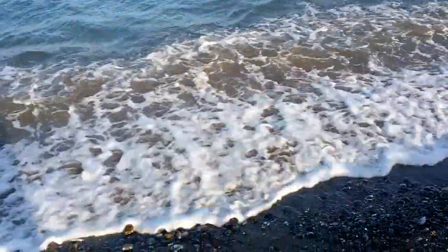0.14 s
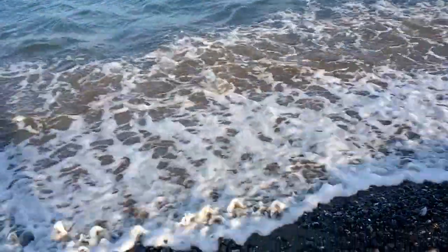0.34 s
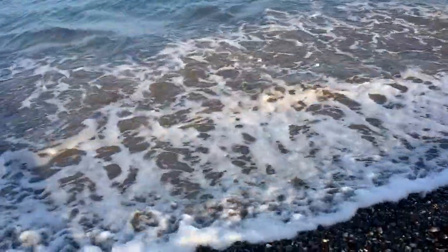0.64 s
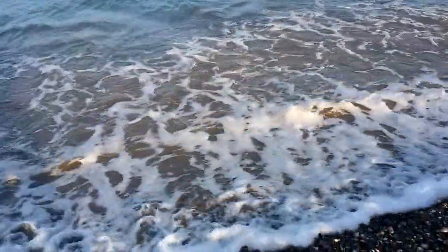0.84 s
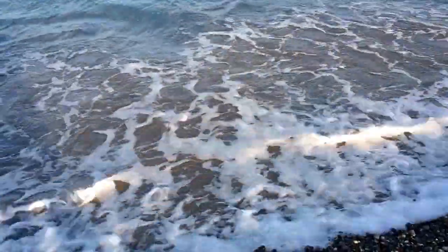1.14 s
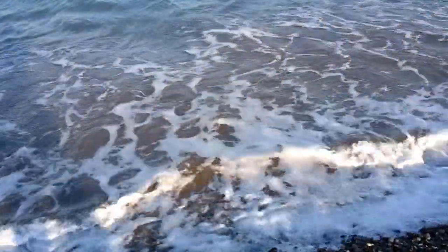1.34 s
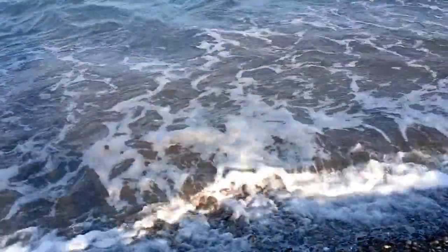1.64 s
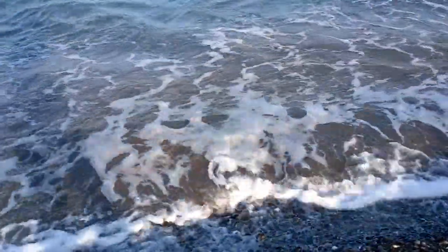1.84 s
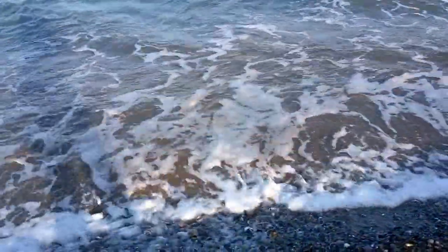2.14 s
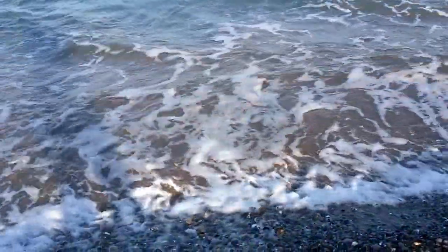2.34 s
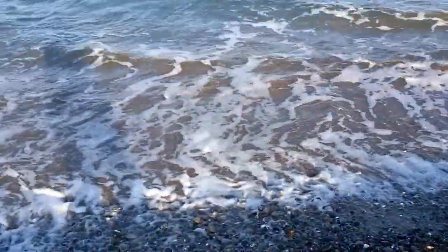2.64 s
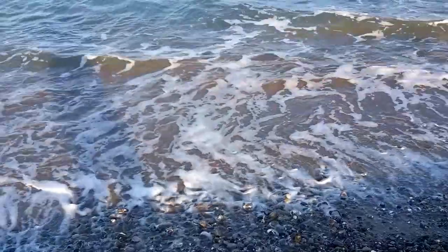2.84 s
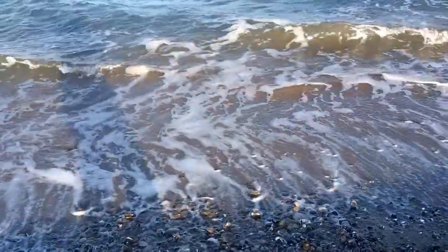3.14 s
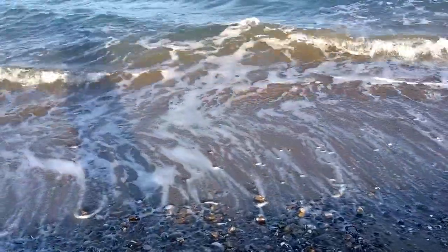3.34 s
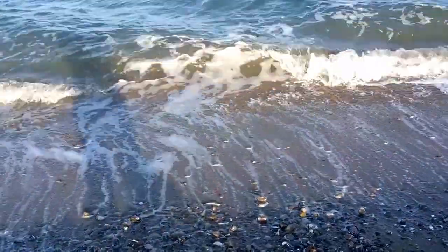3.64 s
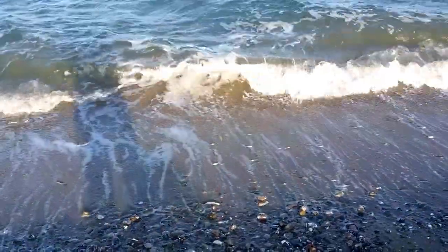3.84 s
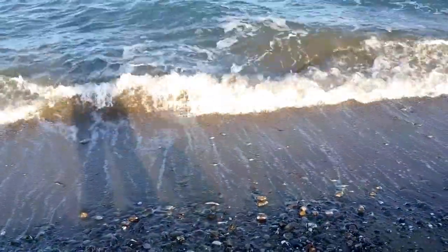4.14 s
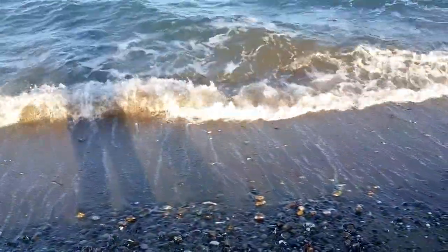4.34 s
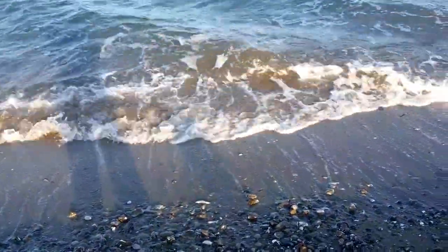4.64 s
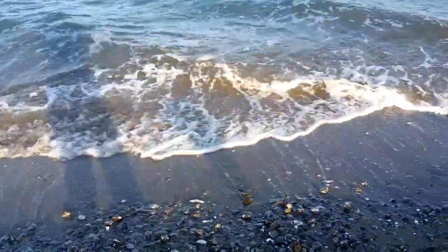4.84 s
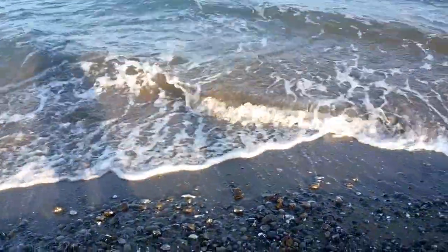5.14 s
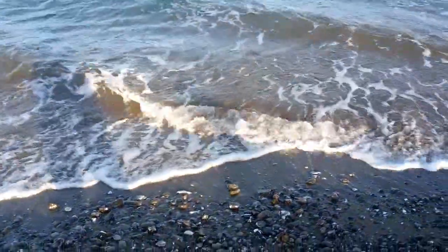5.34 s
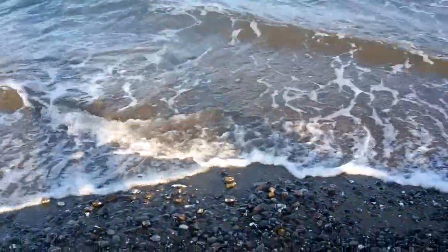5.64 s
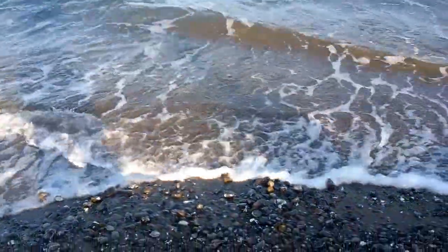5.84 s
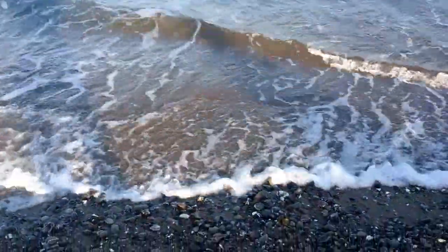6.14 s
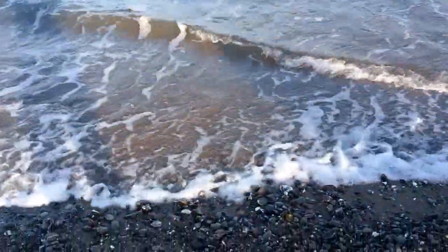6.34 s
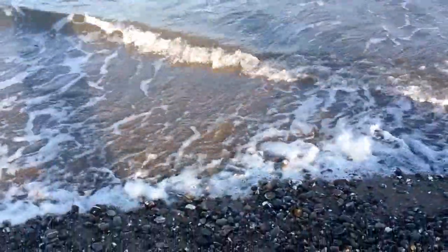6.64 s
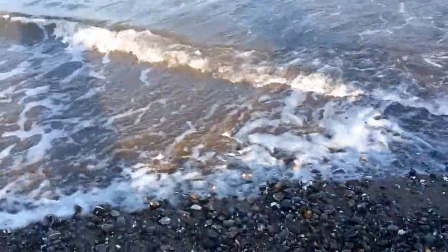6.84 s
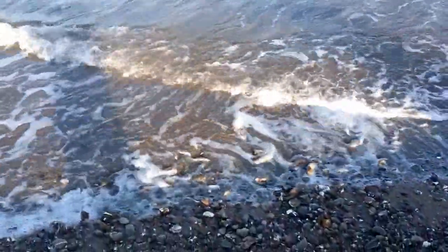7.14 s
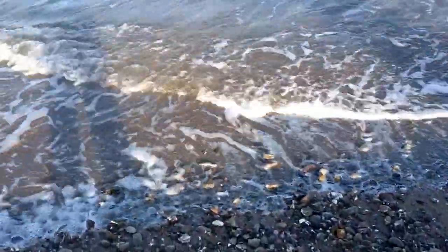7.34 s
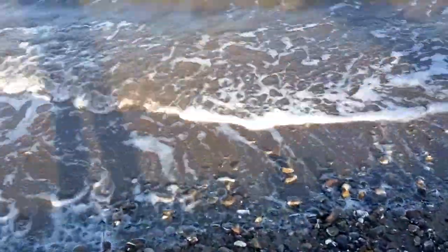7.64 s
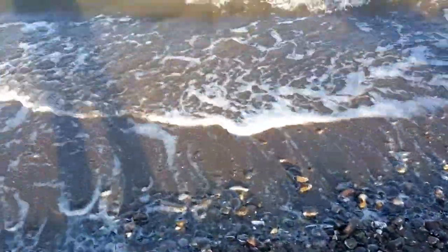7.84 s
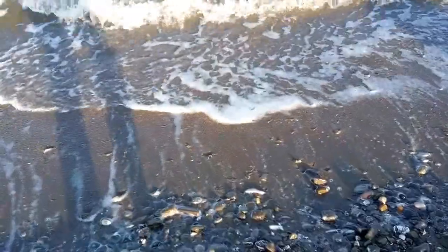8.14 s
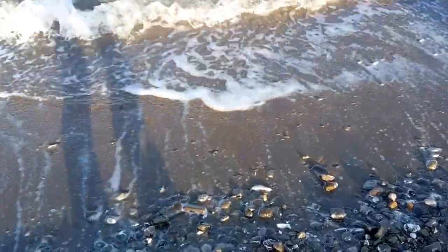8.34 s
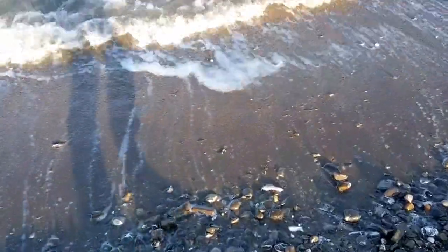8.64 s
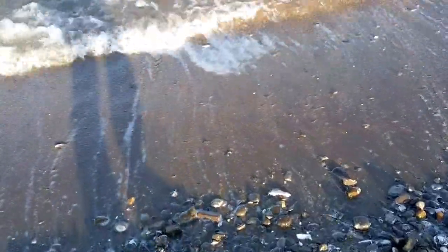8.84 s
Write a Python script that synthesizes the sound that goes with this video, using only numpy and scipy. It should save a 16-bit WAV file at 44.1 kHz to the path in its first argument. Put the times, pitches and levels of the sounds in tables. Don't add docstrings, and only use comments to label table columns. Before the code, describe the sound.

Outdoors on a pebble and sand shore, wind hits a small unprotected microphone, loud and fluttering with low rumble and crackly snaps. Behind it, foam hisses faintly, swelling near four seconds and again near eight. The wind drops abruptly around three seconds, returns, and weakens near the end. Tiny drop spatters and pebble ticks appear, clearest around six and a half to eight seconds.

```python
import sys
import numpy as np
from scipy import signal
from scipy.fft import rfft, irfft, next_fast_len
from scipy.io import wavfile
from scipy.ndimage import uniform_filter1d, minimum_filter1d, map_coordinates

SR = 44100
rng = np.random.default_rng(int(sys.argv[2]) if len(sys.argv) > 2 else 0)


def natural_amplitude(level_db):
    exponent = np.asarray(level_db, float) / 20
    return 10 ** exponent


def int16_out(signal):
    q = np.round(np.clip(np.atleast_2d(signal).T, -1, 1) * 32767)
    wavfile.write(sys.argv[1], SR, q.astype(np.int16))


N = 396459


def unit(x):
    return x / np.sqrt(np.mean(x ** 2) + 1e-20)


def curves(rows):
    s, *cols = np.transpose(rows)
    return [np.interp(np.arange(N) / SR, s, c) for c in cols]


def bumps(rows):
    s, *cols, ms = np.transpose(rows)
    t = np.arange(0, N + 64, 64) / SR
    bells = np.exp(-.5 * ((t[:, None] - s) / (.001 * ms)) ** 2)
    return [np.interp(np.arange(N) / SR, t, bells @ c) for c in cols]


def wobble(rate):
    knots = rng.standard_normal(1000 + N // 50)
    return map_coordinates(knots, [np.arange(N) * rate / SR])


def filtered(x, response):
    m = next_fast_len(N + SR // 2)
    return irfft(rfft(x, m) * response(np.fft.rfftfreq(m, 1 / SR)), m)[..., :N]


def coloured(x, spectrum):
    f, db = np.transpose(spectrum)
    return unit(filtered(x, lambda hz: natural_amplitude(np.interp(np.log(hz + 1), np.log(f), db, left=-120))))


def patchy(depth_db):
    z = signal.stft(rng.standard_normal(N), nperseg=512)[2]
    field = uniform_filter1d(rng.standard_normal(z.shape), size=8, axis=0)
    field = uniform_filter1d(field, size=8, axis=1)
    return signal.istft(z * natural_amplitude(depth_db * unit(field)), nperseg=512)[1][:N]


def crackle(density, spread_db):
    chance, size, sign = rng.random((3, N))
    click = natural_amplitude(-spread_db * np.log(size + .08)) * np.sign(sign - .5)
    return (chance < density / SR) * click


# (time [s], wash level [dB])
SURF = [(0, -42.5), (.55, -43), (.75, -48), (1.0, -46), (1.5, -52.5), (3.15, -46.5), (3.4, -42), (4.1, -38),
        (4.45, -40), (4.62, -39.5), (4.84, -41.5), (4.93, -46.5), (5.4, -49.5), (5.9, -49), (6.42, -51.5),
        (6.5, -47), (7.4, -44.5), (7.7, -42.5), (8.1, -39.5), (8.99, -41)]
# (frequency [Hz], level [dB per Hz])
WASH = [(150, -42), (400, -11), (1000, -13), (2000, -17.5), (3000, -22), (4500, -28), (6000, -30.5),
        (8000, -37.5), (11000, -42.5), (16000, -45)]
# (frequency [Hz], level [dB per Hz])
SPRAY = [(3000, -27), (5000, -1.5), (7000, -3), (9000, -6), (12000, -3), (16000, -6)]


def surf():
    flicker_db = 0.14 * wobble(5.6) + 0.71 * wobble(30)
    wash = coloured(patchy(depth_db=1.0) + 0.41 * unit(crackle(1200, spread_db=11.0)), WASH)
    spray = coloured(patchy(depth_db=.5) + .55 * unit(crackle(500, spread_db=5.5)), SPRAY)
    wash_db, = curves(SURF)
    spray_db = -60 + 0.4 * (wash_db + 45)
    wash *= natural_amplitude(wash_db + 3.5 + 0.43 * wobble(15))
    spray *= natural_amplitude(spray_db + 1.0 + .8 * wobble(5))
    return natural_amplitude(flicker_db) * (wash + spray)


# (start [s], length [s], level [dB])
SPLASHES = [
    (-.01, .025, -50),
    (4.585, .05, -56),
    (6.442, .11, -50.5),
    (6.694, 0.056, -55.5),
    (7.435, 0.1, -43.5),
    (8.035, .04, -47),
    (8.63, .05, -55),
]


def splashes():
    t = np.arange(N) / SR
    shower = coloured(rng.standard_normal(N) * 0.21 + unit(crackle(2500, spread_db=-0.5)), SPRAY)
    shower *= natural_amplitude(3.1 * wobble(70))
    gate = np.zeros(N)
    for s, span, db in SPLASHES:
        fade_db = 5 * np.clip(.5 - (t - s) / span, -1, 1)
        edges = np.clip(np.minimum(t - s, s + span - t) / 0.0081, 0, 1)
        gate += natural_amplitude(db + fade_db) * edges
    return gate * shower


# (time [s], peak level [dB], brightness [dB])
TICKS = [(0, -28, -15), (.5314, -39, -20), (0.7132, -28, -32), (1.4336, -38, -25), (1.704, -33, -23),
         (1.709, -35.5, -33), (3.258, -30, -30), (3.2934, -37, -23), (3.3114, -34, -19), (3.3827, -23, -23),
         (3.505, -29, -29), (4.53, -29.5, -22), (4.673, -26, -20), (4.7935, -30, -24), (6.449, -33, -23),
         (6.4566, -26.5, -21.5), (6.489, -27, -23), (6.508, -35.5, -25), (6.5264, -40, -15),
         (6.5424, -31, -20), (7.2638, -32, -21), (7.425, -33, -23), (7.4414, -33, -18), (7.547, -27.5, -18),
         (7.5854, -30, -18), (7.67, -28, -25), (7.751, -29.5, -21), (8.0357, -26, -23), (8.0534, -31, -24),
         (8.646, -26.5, -19)]
TICK_MS = 1.3


def ticks():
    out, t = np.zeros(N + SR), np.arange(SR // 25) / SR
    dull = signal.butter(2, [3000, 8000], "band", fs=SR)
    bright = signal.butter(1, [7000, 14000], "band", fs=SR)
    for s, db, bright_db in TICKS:
        puff = rng.standard_normal(len(t)) * np.exp(-.5 * (2200 * t / TICK_MS - 2.5) ** 2)
        body = signal.lfilter(*dull, puff) + natural_amplitude(bright_db + 15.5) * signal.lfilter(*bright, puff)
        out[round(s * SR):][:len(t)] += natural_amplitude(db - 4.0) * body
    return out[:N]


# (time [s], level [dB], air speed as share of power above 500 Hz [dB])
WIND = [(0, -11.5, -5), (1.6, -15.5, -4.5), (1.77, -23.5, -21), (1.97, -19, -15), (2.02, -13, -8),
        (2.85, -19, -6), (2.92, -38.5, -19), (3.4, -27, -23), (3.6, -18, -21), (4.3, -13.5, -6.5),
        (4.75, -16, -17.5), (5.3, -12, -12.5), (5.85, -13.5, -3.5), (6.3, -14, -5.5), (6.95, -14, -9.5),
        (7.72, -20.5, -17.5), (7.82, -31, -13), (8.99, -28.5, -10)]
# (time [s], level change [dB], speed change [dB], half width [ms])
PUFFS = [(.7, 1, 2, 56), (.87, 3.5, 2, 24), (1.01, 1.5, 2, 70), (1.25, -0.5, 2.5, 25), (1.47, 1, 2.5, 65),
         (1.72, 10, -14, 13), (1.95, 2.5, 0, 15), (2.1, -2, 6.5, 45), (2.2, 11, -18, 25),
         (2.4, 4.5, -1, 25), (2.69, 3.5, -10, 54), (3.06, 4, -20, 13), (3.18, 2, -8, 7.5),
         (3.25, 4.5, -20, 48), (3.58, 4.5, -3, 53), (4.05, 3, 3, 28), (4.28, 4, 0, 15), (4.63, 7, -3, 6.7),
         (5.48, -1, 10, 43), (5.82, 1.5, 4.5, 34), (7.15, 3, -3, 85), (7.46, 3, 9, 40), (7.55, 9, 11, 9.3),
         (7.76, 5.5, -22, 14), (7.93, 6, -13, 17), (8.03, 9, -8, 12), (8.21, 11, -5, 48),
         (8.43, 9.5, -2, 21), (8.6, 4.5, -2, 21), (8.96, 8.5, -8, 17)]
# (time [s], level change [dB], speed change [dB], half width [ms])
LULLS = [(.06, -2, 3.5, 28), (.43, -4.5, 0, 17), (.55, -1.5, -1.5, 97), (.8, -1, 2, 14),
         (1.12, -6, -4.5, 66), (1.3, -8, -15, 14.5), (1.62, -2, -12, 19), (1.76, -5, -9, 13),
         (1.985, -6, -3, 6.8), (2.29, -1, -1.5, 27), (2.54, -4, 1.5, 21), (2.74, -7, 3, 20),
         (3.01, 0.5, -7, 30), (3.95, -5.5, 3, 33), (4.83, -5.5, 1, 21), (5.25, -7.5, -1.5, 33),
         (5.58, -9, -1, 13), (5.66, -3, -2.5, 43), (5.92, -0.5, -26, 28), (6.022, -11.5, -9.5, 42),
         (6.89, -7, 0, 84), (7.51, -6, -15, 11), (7.61, -4, 0, 29), (7.88, -7, -22, 52), (8.21, 0, 4, 8.6),
         (8.31, 1, 0, 25)]


def air():
    return np.add(curves(WIND), bumps(PUFFS + LULLS))


def strays(share_db, level_db):
    place, size, span = rng.random((320, 3)).T
    at = (place * N).astype(int)
    speed_db = 1.24 * np.maximum(share_db[at] + 7, -6.5)
    db = -26 + speed_db + level_db[at] + 13.5 - 4.5 * size
    return list(zip(place * N / SR, db, 1.07 + 6 * span ** 2))


# (time [s], level above 1.2 kHz [dB], half width [ms])
SWIRLS = [(.113, -28, 11), (.327, -20.5, 54), (.849, -15, 5.2), (.984, -29, 16), (1.042, -22, 11),
          (1.171, -26.5, 21), (1.235, -23.5, 21), (1.531, -17.5, 8.8), (1.576, -18, 4.4),
          (1.655, -17.5, 7.4), (2.058, -20, 5.6), (2.148, -18.5, 9.3), (2.216, -20.5, 24),
          (2.377, -13.5, 9), (2.594, -27, 3.6), (2.681, -21, 10), (2.784, -23.5, 7.9), (5.473, -13.5, 13),
          (5.845, -14, 12), (5.893, -11, 6.1), (6.212, -11.5, 10), (6.283, -11, 9.6), (6.357, -11.5, 18),
          (6.491, -14.5, 35), (6.601, -20.5, 15), (6.637, -19, 19), (6.753, -21.5, 6.7), (7.079, -18, 9.9),
          (7.472, -19, 7.4), (7.541, -20.5, 5.3)]
# (time [s], level above 1.2 kHz [dB], half width [ms])
SNAPS = [(.266, -21, 4.4), (.402, -12, 2.2), (0.687, -17, 9.5), (.715, -7, 3.5), (1.376, -20.5, 5.3),
         (1.434, -15, 1.8), (1.45, -25, 1.6), (1.475, -22.5, 3.7), (1.713, -25, 2.2), (1.902, -28, 1.4),
         (2.016, -16, 4.3), (2.083, -26, 2.6), (2.163, -15, 1.2), (2.354, -18, 2.8), (2.471, -21, 2.6),
         (2.619, -19.5, 4.4), (2.66, -17.5, 4.8), (3.386, -26, 2.1), (4.517, -23, 2), (4.928, -20, 2.5),
         (5.146, -20.5, 6.1), (5.351, -23, 8.1), (5.394, -23, 5.2), (5.773, -17, 8.8), (5.86, -16, 3),
         (6.15, -15, 2.1), (6.313, -13, 4.1), (6.57, -15.5, 4), (6.779, -19, 11), (7.208, -21, 5)]


def eddies(share_db, level_db):
    t = np.arange(N) / SR
    power, kicks = np.full(N, 1e-9), np.zeros(N)
    every = list(SWIRLS) + list(SNAPS) + strays(share_db, level_db)
    for (s, db, ms), (sign, size) in zip(every, rng.random((len(every), 2))):
        near = slice(max(round((s - .1) * SR), 0), round((s + .1) * SR))
        since = t[near] - s
        power[near] += natural_amplitude(2 * (db - 3)) * np.exp(-.5 * (since / (.001 * ms)) ** 2)
        core_s = 0.00014 * (1 + 0.25 * size) * natural_amplitude(-.22 * (db + 24.5))
        u = since / core_s
        kicks[near] += np.sign(sign - .5) * natural_amplitude(db + 4.5) * u * np.exp(-.5 * u ** 2)
    return power, kicks


def corner(edge_hz, share_db):
    return edge_hz / np.log(1 + 1 / natural_amplitude(2 * np.clip(share_db, -60, 6)))


KNEE_HZ = 130


def turbulence(width_hz):
    hz, frames, z = signal.stft(rng.standard_normal(N), SR, nperseg=256, noverlap=224)
    scale = hz[:, None] / np.interp(frames, np.arange(N) / SR, width_hz)
    shape = (scale + 0.25) ** 0.44 * np.exp(-.6 * scale ** 1.062)
    shape /= np.sqrt(np.mean(shape[(hz > KNEE_HZ) & (hz < 550)] ** 2, axis=0))
    return signal.istft(z * shape, SR, nperseg=256, noverlap=224)[1][:N]


# (time [s], level change [dB], half width [ms])
HEAVES = [(.05, -0.5, 110), (.4, -7, 120), (.67, 1, 26), (1.04, 5, 30), (1.25, 7, 42), (1.75, 2.5, 33),
          (2.1, 3, 61), (2.45, 7.5, 120), (4.08, 7, 48), (4.23, 12.5, 25), (4.5, 8.5, 94), (4.86, 8.5, 125),
          (5.2, 0, 60), (5.7, -6, 75), (5.93, -2.5, 21), (6.08, 9, 11), (6.22, 7, 19), (6.45, 5, 82),
          (6.79, 3.5, 29), (7.25, 0, 71), (7.48, 6.5, 60), (7.79, 5.5, 30), (7.94, 8, 34), (8.11, 9.5, 20),
          (8.71, 6, 17), (8.87, 7, 47)]


def wind():
    level_db, share_db = air()
    power, kicks = eddies(share_db, level_db)
    level_db = level_db + 1.84 * wobble(12)
    eddy_hz = corner(1084, 10 * np.log10(power) - level_db - 11.0)
    flow_hz = corner(437, share_db - 5.0) * natural_amplitude(0.81 * wobble(40) + 0.42 * wobble(170))
    width_hz = (eddy_hz ** 4 + flow_hz ** 4) ** (1 / 4) * natural_amplitude(1.37 * wobble(260))
    flutter = filtered(turbulence(width_hz), lambda f: 1 / np.sqrt(1 + (KNEE_HZ / (f + 1)) ** 6))
    rumble = unit(filtered(rng.standard_normal(N), lambda f: 1 / np.sqrt(1 + (f / KNEE_HZ) ** 6)))
    gusty = 1 + 0.07 * np.clip(-15 - curves(WIND)[0], 0, 20)
    throb_db = (0.38 * wobble(18) + 1.75 * wobble(60)) * gusty
    rumble_db = -24.5 + 0.59 * (level_db + 14.5) - 0.14 * (share_db - 2)
    rumble_db += bumps(HEAVES)[0] + 1.5 * wobble(9)
    flutter *= natural_amplitude(level_db + 18.0 + throb_db)
    rumble *= natural_amplitude(rumble_db + 4.5 + 0.12 * throb_db)
    return flutter + rumble + kicks


def scene():
    return (surf() + splashes() + ticks() + wind())[None]


def low_pass(x):
    return signal.sosfilt(signal.butter(12, 16360, fs=SR, output="sos"), x)


# (frequency [Hz], width [Hz], level [dB])
PORT = (6104, 780, 13.2)
LOW_CUT_HZ, TOP_HZ = 53.4, 15730
SQUEEZE, SQUEEZE_DB, SQUEEZE_MS = 0.18, -17, 50


def record(dry):
    hz0, width, db = PORT

    def port(f):
        return 1 + natural_amplitude(db) * 1j * f * width / (hz0 ** 2 - f ** 2 + 1j * f * width)

    def low_cut(f):
        steep = (f ** 2 / (f ** 2 - LOW_CUT_HZ ** 2 - 1.2j * f * LOW_CUT_HZ)) ** 2
        return steep * 1j * f / (1j * f + 60) * 1j * f / (1j * f + 65)

    x = filtered(dry, lambda f: port(f) * low_cut(f) * (f < TOP_HZ))
    mean_power = uniform_filter1d(x ** 2, size=round(SQUEEZE_MS * SR / 1000))
    loud_db = 10 * np.log10(np.abs(mean_power) + 1e-9)
    x = x * natural_amplitude(-SQUEEZE * np.maximum(loud_db - SQUEEZE_DB, 0))
    need = np.minimum(1, .94 / (np.abs(x) + 1e-9))
    x = x * uniform_filter1d(minimum_filter1d(need, size=400), size=400)
    return low_pass(x)


dry = scene()
out = record(dry)
int16_out(out)
```